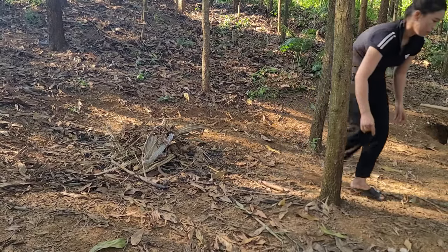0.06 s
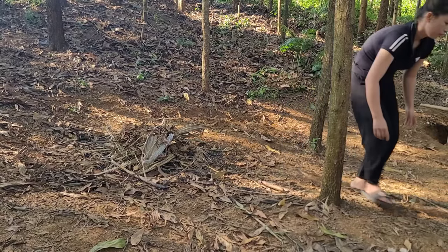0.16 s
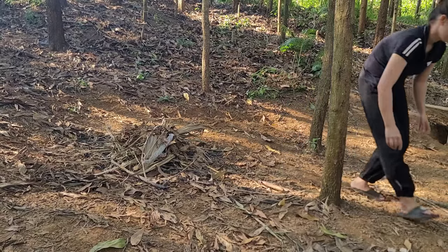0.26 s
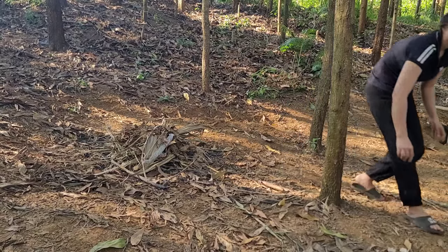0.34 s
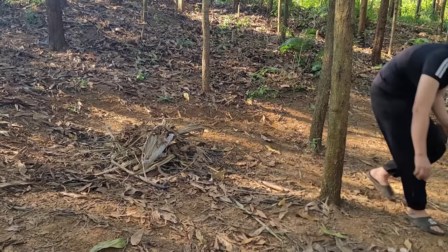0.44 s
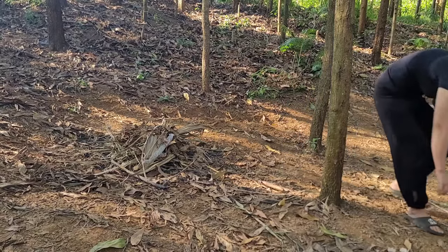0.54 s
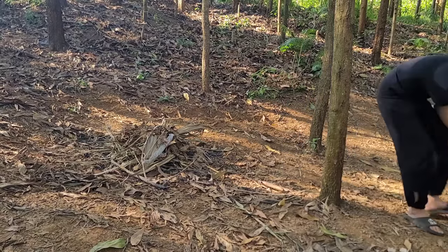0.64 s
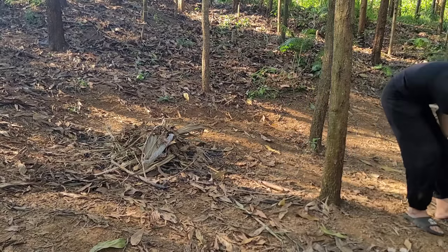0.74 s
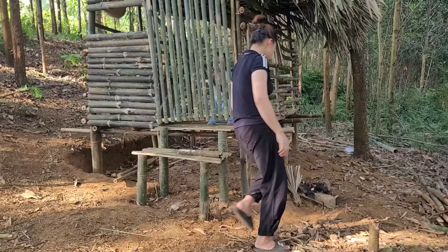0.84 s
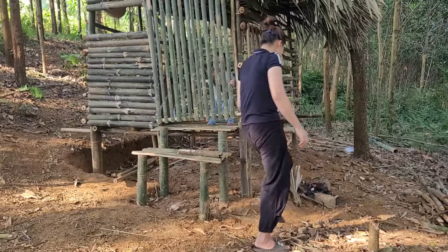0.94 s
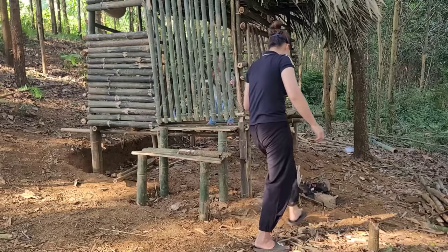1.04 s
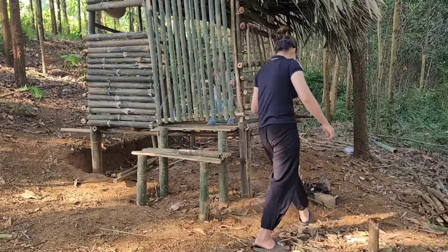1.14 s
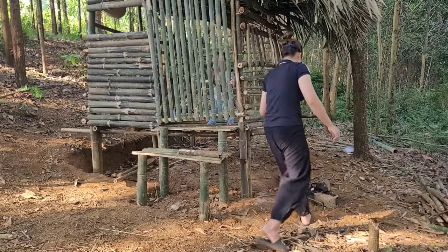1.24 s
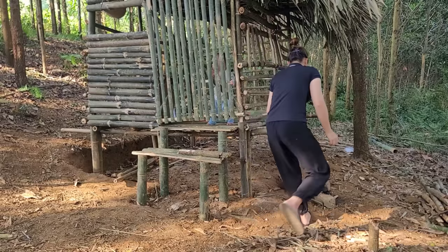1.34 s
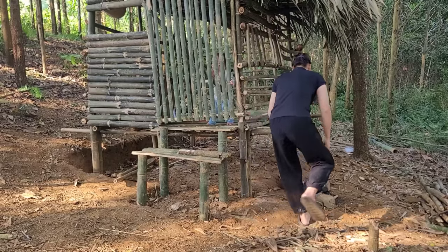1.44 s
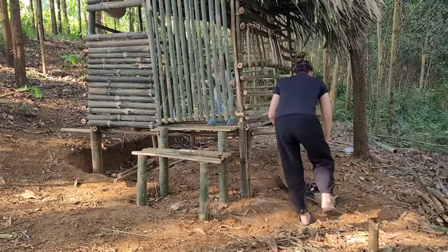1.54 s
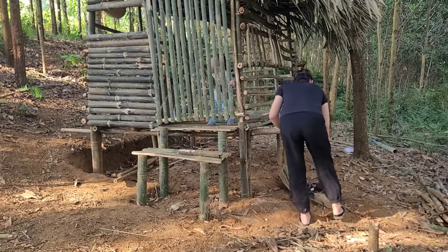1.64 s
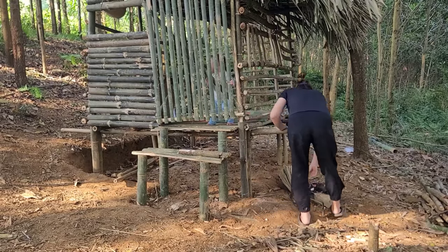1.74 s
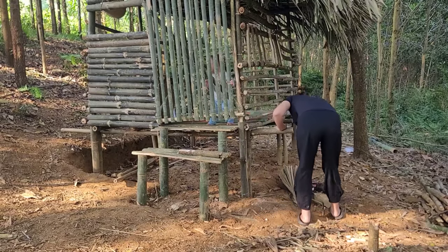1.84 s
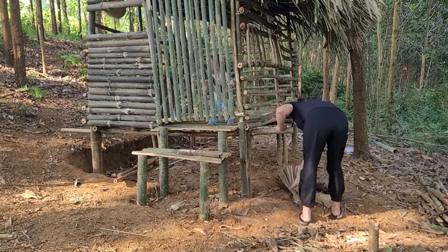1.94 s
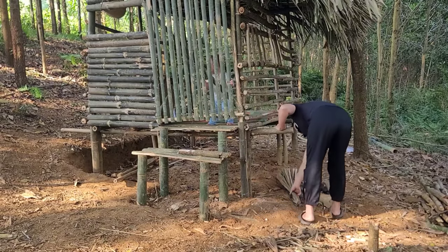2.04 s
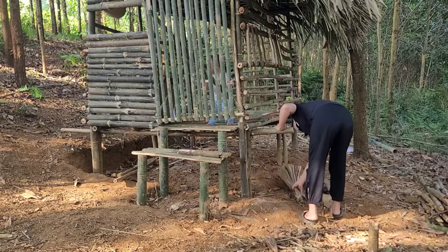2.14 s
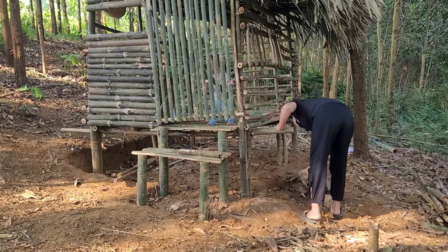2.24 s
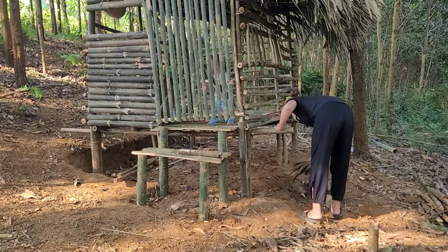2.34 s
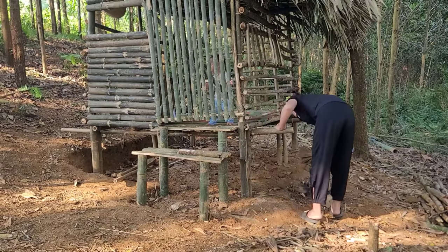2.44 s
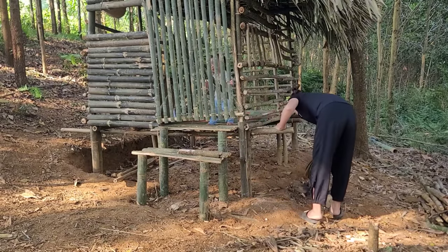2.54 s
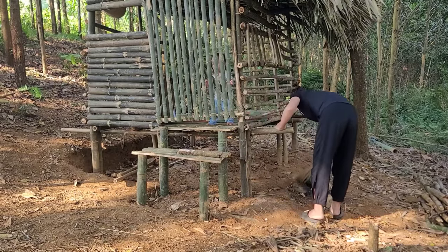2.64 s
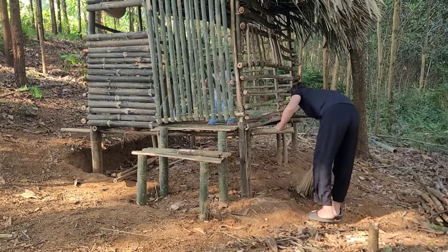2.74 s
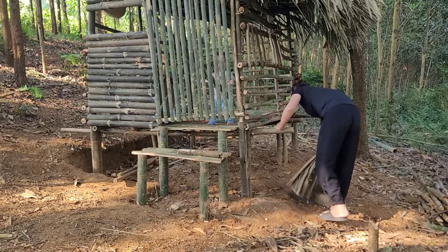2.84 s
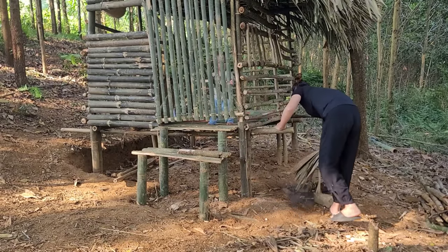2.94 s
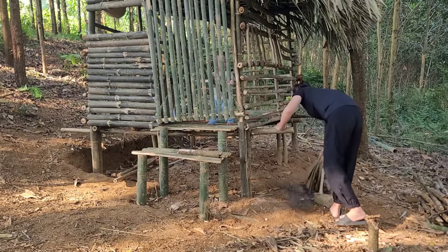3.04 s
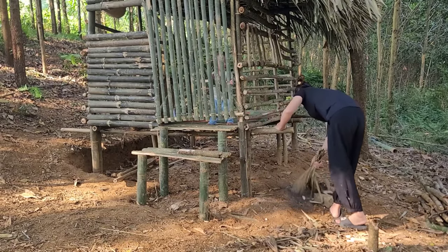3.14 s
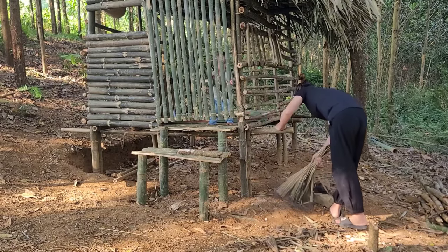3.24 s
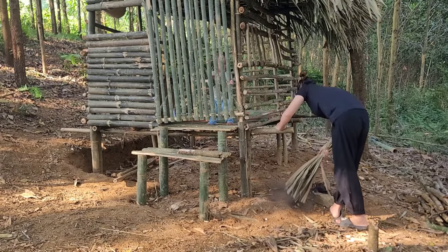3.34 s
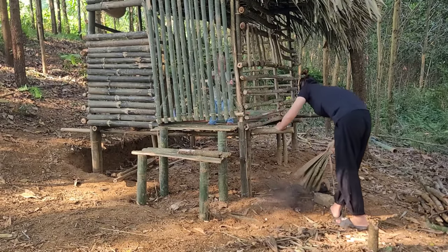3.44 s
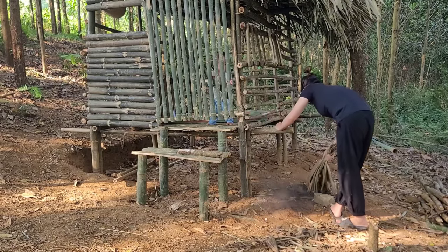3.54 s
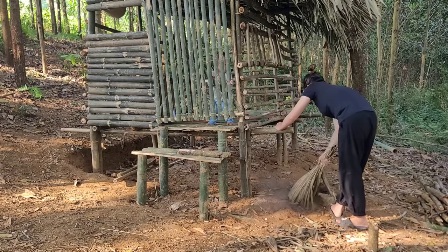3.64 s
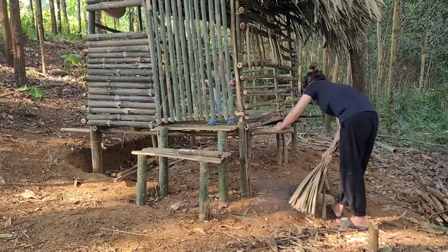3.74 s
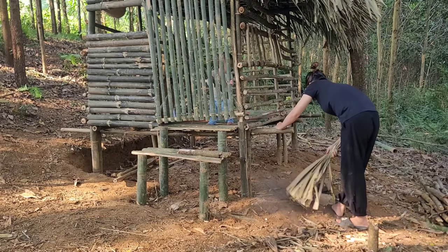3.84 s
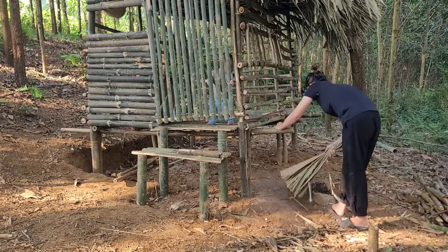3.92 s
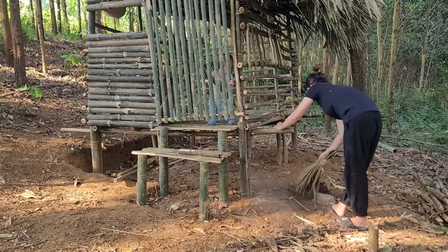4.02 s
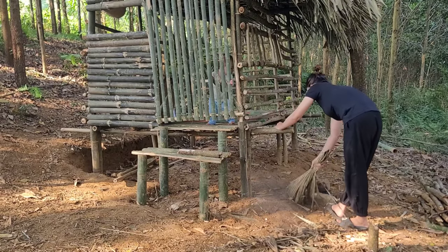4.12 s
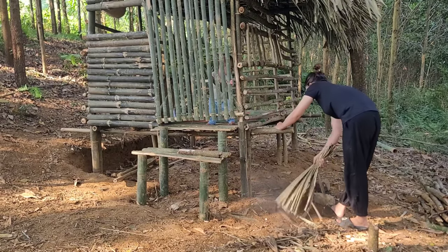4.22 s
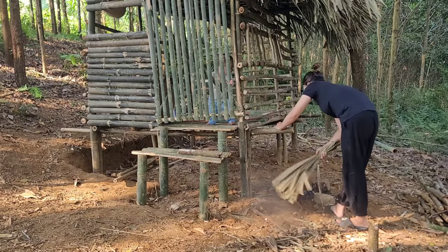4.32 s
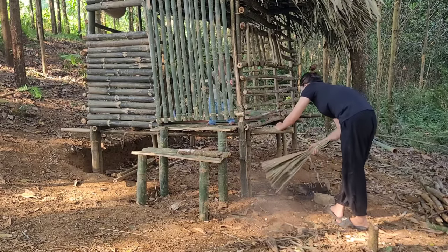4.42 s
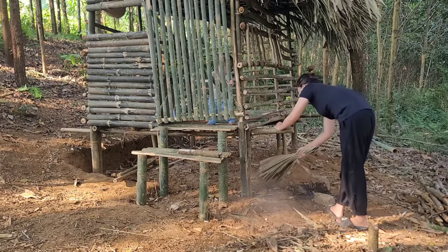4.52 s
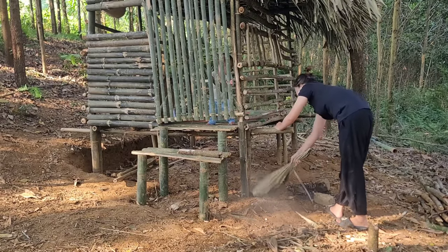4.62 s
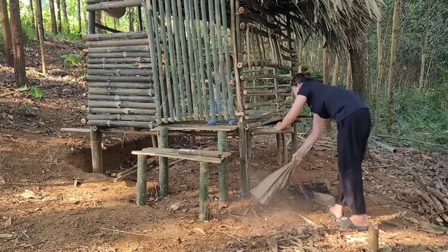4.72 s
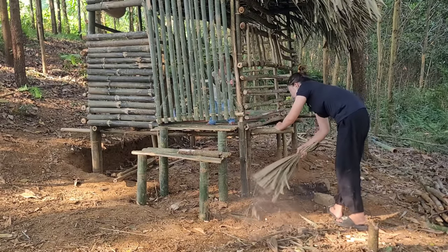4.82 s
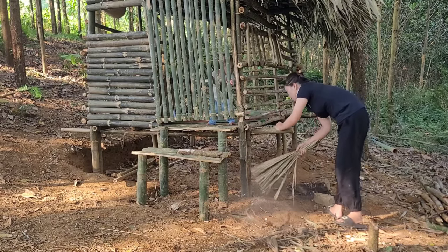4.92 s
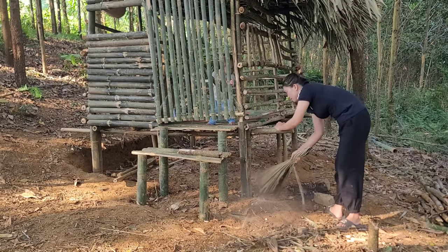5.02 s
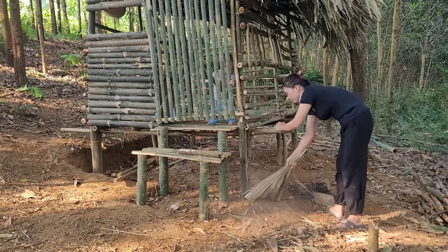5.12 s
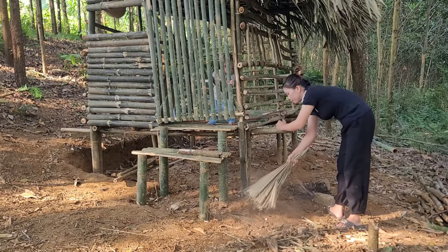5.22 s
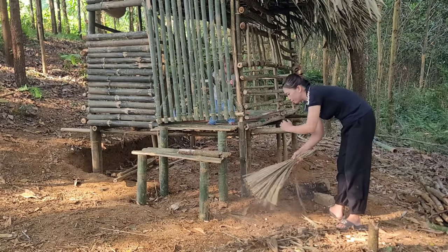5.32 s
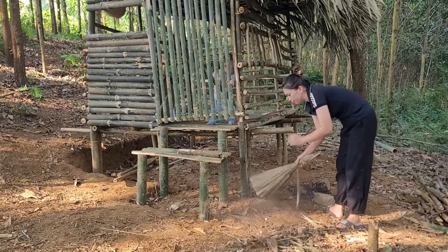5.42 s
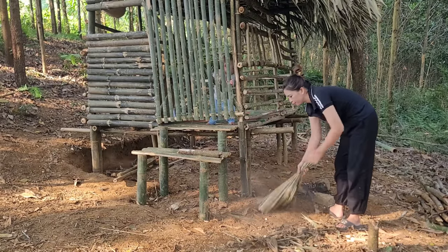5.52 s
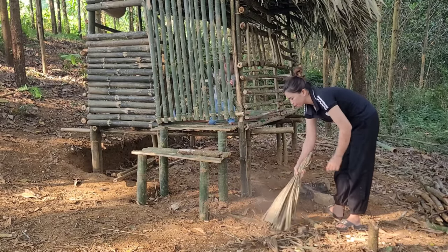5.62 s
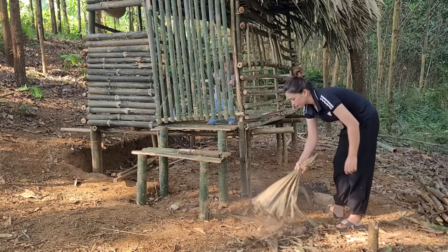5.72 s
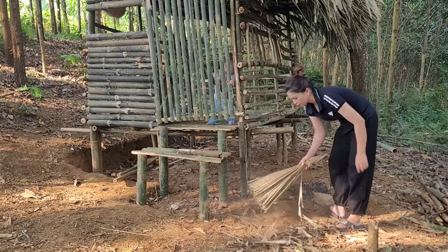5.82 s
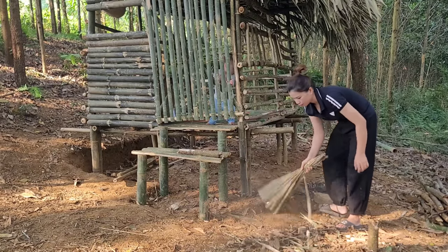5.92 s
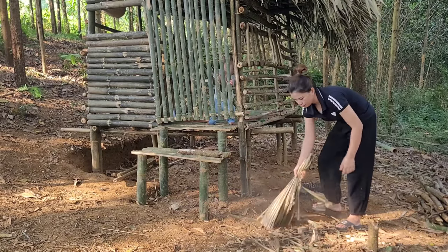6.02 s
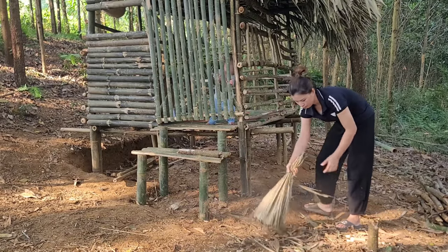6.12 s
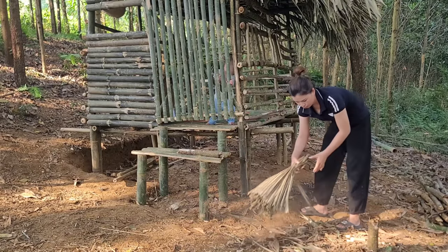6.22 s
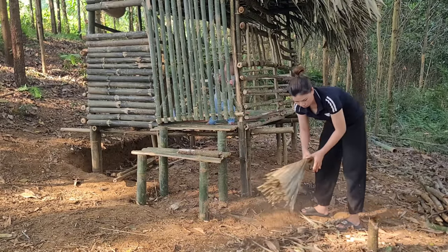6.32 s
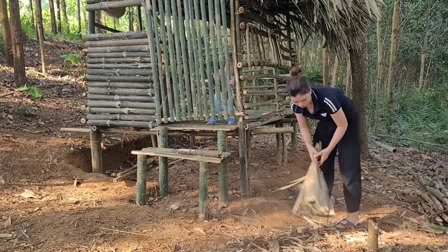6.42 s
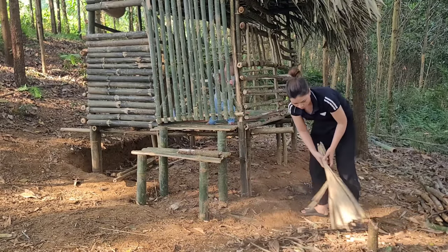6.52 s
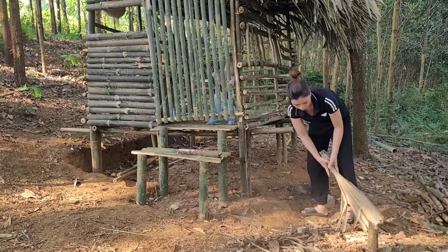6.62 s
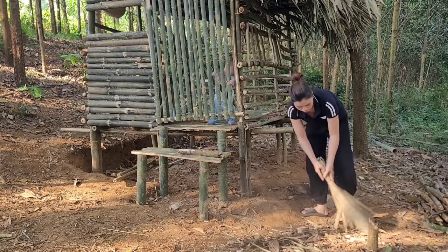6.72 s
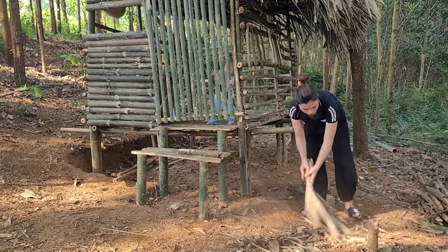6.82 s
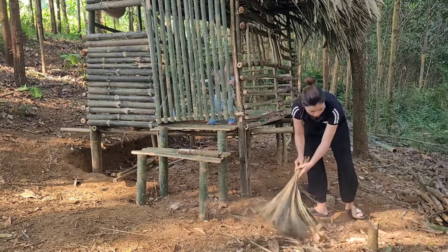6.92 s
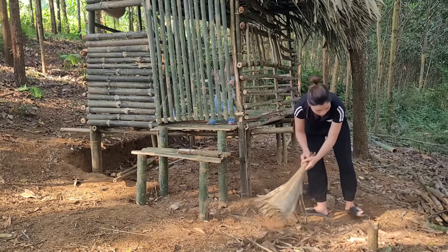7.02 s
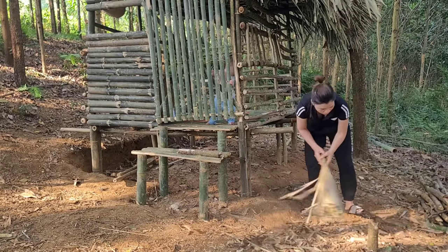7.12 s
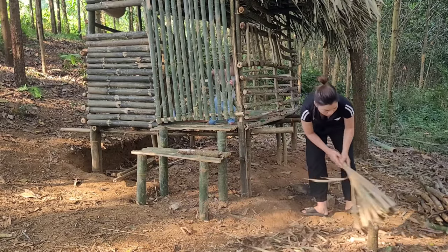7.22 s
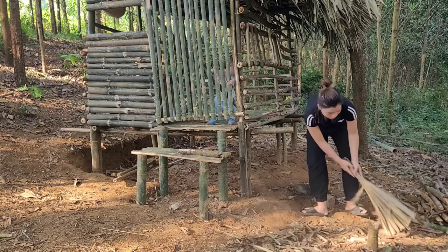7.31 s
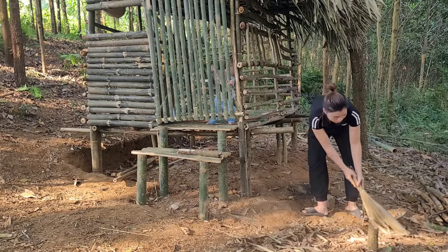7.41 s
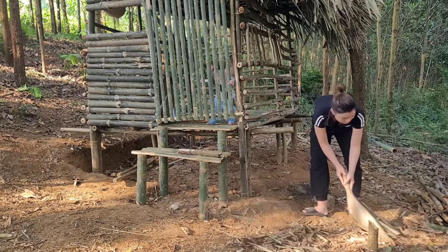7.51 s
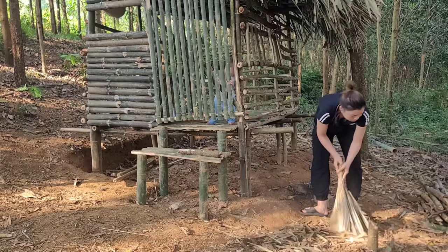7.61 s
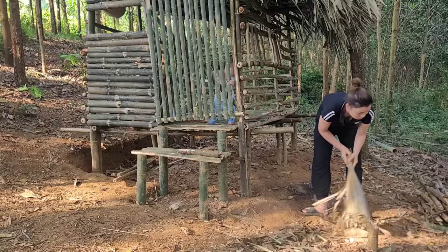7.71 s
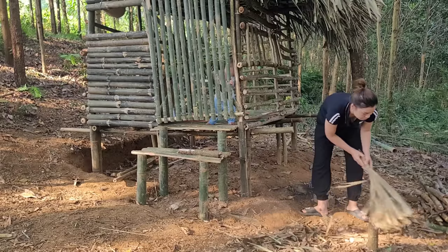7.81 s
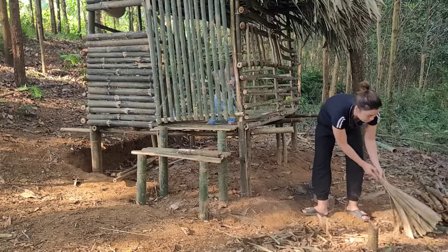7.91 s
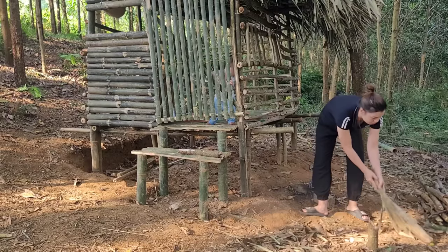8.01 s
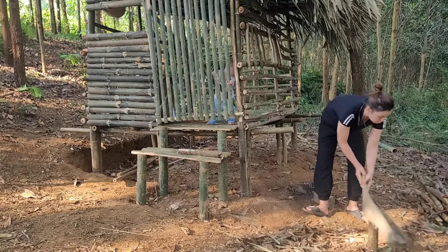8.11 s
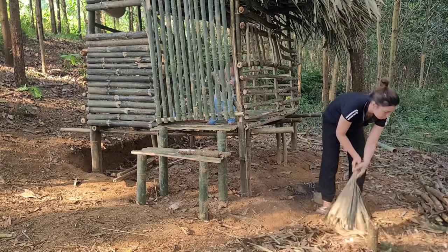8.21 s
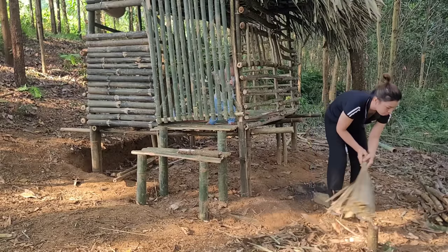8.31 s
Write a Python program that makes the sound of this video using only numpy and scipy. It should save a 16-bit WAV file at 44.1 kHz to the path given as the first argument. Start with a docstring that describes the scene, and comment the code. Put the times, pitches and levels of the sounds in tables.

```python
"""Insects trill all round over noise-made air; a far single-cylinder engine, a sum of firing orders, chugs on a slope.
A short silence leads to a second scene by a hut, where the engine is gone, with a low rumble in the air and
more insects; birds glide far off. Sandalled steps slap and thud as short noise bursts, amid light scuffs in the litter.
Then a dry-grass broom makes eleven strokes over bare earth: random grains scrape, rumble, hiss and crackle.
Twigs snap now and then; nearby surfaces scatter the near sounds and the wood returns a faint tail."""
import sys
import numpy as np
from scipy import signal
from scipy.fft import rfft, irfft, next_fast_len
from scipy.io import wavfile
from scipy.ndimage import uniform_filter1d

SR = 44100
rng = np.random.default_rng(int(sys.argv[2]) if len(sys.argv) > 2 else 0)


def pcm_store(signal):
    """Save signal as 16-bit PCM."""
    levels = np.round(np.clip(np.atleast_2d(signal), -1, 1) * 32767)
    wavfile.write(sys.argv[1], SR, levels.astype(np.int16).T)


N = 368676
TIME_S = np.arange(N) / SR
FFT_LEN = next_fast_len(N + SR, True)
FREQ_HZ = np.fft.rfftfreq(FFT_LEN, 1 / SR)

SLOPE_END_S, HUT_START_S = 0.838, 0.862  # silent between the two scenes

# Air spectra of the two scenes. Each row: frequency in Hz, relative density in dB per Hz.
SLOPE_AIR = [(25, -8), (120, 19), (300, -3), (450, -10.5), (750, -10.5), (1700, -6), (3500, -14),
             (5800, -20), (6700, -5), (7400, 8), (8600, -40), (11500, -25), (15500, -20)]
HUT_AIR = [(25, -21), (55, -1.5), (170, -2.5), (280, -15), (500, -15), (1400, -27), (3500, -29.5),
           (5000, -19), (5900, -26), (6700, -7), (7300, 2), (8800, -36), (11500, -23.5), (15500, -16.5)]
SLOPE_AIR_DB, HUT_AIR_DB = -54.5, -58  # rms before the slow swell
# Insects. Each row: start in seconds, rms level in dB, pitch in Hz, half-width of the band in Hz, mean pulses per second.
INSECTS = [(0, -68.5, 7200, 90, 28), (0.86, -62, 7210, 69.5, 20), (0.86, -69, 7370, 110, 22),
           (0.86, -66.5, 7940, 70, 26), (2.05, -62, 6400, 140, 27)]
# Engine speed. Each row: time in seconds, firings per second.
ENGINE_SPEED = [(0, 28), (0.3, 28.5), (0.5, 27.5), (0.84, 27.5)]
# Engine orders. Each row: multiple of the firing rate, rms level in dB before wavering.
ENGINE_ORDERS = [(1, -68), (1.5, -74), (2, -54.5), (3, -65), (4, -54), (5, -57), (6, -55.5), (7, -80),
                 (8, -89), (9, -81), (10, -86)]
# Far bird whistles. Each row: start in seconds, length in seconds, first pitch in Hz, last pitch in Hz, rms level in dB.
BIRDS = [(0.706, 0.112, 1076, 1230, -66), (0.88, 0.058, 1330, 1400, -80), (1.597, 0.28, 5060, 4950, -79)]

# Sandalled steps. Each row: time in seconds, slap peak in dB, slap centre in Hz, heel thud in dB re slap;
# slaps and thuds each get a common trim in steps().
STEPS = [(1.161, -43, 1840, -1), (1.268, -48, 2530, -20), (1.393, -54.5, 1770, -22),
         (1.463, -57, 3780, -15), (1.775, -47.5, 1750, -8), (2.297, -45, 1720, -18),
         (2.341, -46, 1800, -20)]
HEEL_CENTRE_HZ = 560
# Snapping twigs and stalks. Each row: time in seconds, peak in dB before the trim in snaps(), centre in Hz.
SNAPS = [(0.378, -39, 3540), (2.133, -34, 7640), (2.372, -38, 3020), (2.693, -21.5, 1760),
         (2.978, -19, 5500), (3.596, -18, 6650), (3.736, -35, 4400), (3.948, -31.5, 1010),
         (4.041, -30, 7200), (4.886, -18.5, 5430), (4.91, -24.5, 1480), (4.946, -24, 2820),
         (5.322, -15.5, 6090), (5.727, -21, 2310), (6.228, -27, 1460), (6.599, -20, 4940),
         (7.269, -28, 4150), (7.291, -24.5, 3650), (7.985, -12, 3740)]

# Broom strokes. Each row: touch-down in seconds, pressing in in seconds, full pressure in seconds,
# level in dB before the arch, first touch in dB re full, easing off in dB per second,
# then soil rumble, tip hiss and settling litter, each in dB re level.
STROKES = [ (2.568, 0.13, 0.099, -34.5, -11.5, 90, -7.5, -2, -6),
           (3.067, 0.12, 0.07, -31.5, -9, 109, -7.5, -2.5, -17),
           (3.588, 0.058, 0.054, -28.5, -7, 153, -8.5, -1, -15.5),
           (4.040, 0.083, 0.11, -31, -18, 130, -7.5, 0, -13.5),
           (4.592, 0.047, 0.098, -30.5, -12, 102, -10, -6, -13),
           (5.011, 0.083, 0.11, -30.5, -26, 135, -8.5, -5, -11),
           (5.474, 0.042, 0.14, -30.5, -9.5, 126, -9.5, -4.5, -16.5),
           (5.932, 0.06, 0.12, -30, -16, 155, -9, -5, -18),
           (6.716, 0.14, 0.15, -31.5, -10.5, 180, -11.5, -5, -16.5),
           (7.286, 0.17, 0.16, -33, -11, 86, -9, -6.5, -17.5),
           (7.874, 0.18, 0.12, -31, -12.5, 79, -9, -4.5, -20)]
TOUCH_RISE_S, ARCH_DB = 0.0097, 1.4  # quick touch; slight swell in mid-push
EARTH_POWER = 1.17  # rumble grows faster with pressure than scrape
# Scuffs of the feet and catches of the broom in the litter. Each row: start in seconds, length in seconds,
# level in dB, soil rumble in dB re level, hiss in dB re level.
SCUFFS = [ (0.21, 0.26, -63.5, -15, -13), (1.097, 0.036, -57, -13, -2), (1.255, 0.032, -61.5, -18, 3),
          (1.961, 0.22, -59, -9, -5), (2.284, 0.075, -55.5, -21, 0), (2.41, 0.14, -62, -20, -4),
          (2.69, 0.011, -39, -4, 6), (2.786, 0.012, -32.5, -3, 1.5), (3.076, 0.034, -39.5, -11, -1),
          (4.205, 0.044, -34, -9.5, -18), (4.996, 0.015, -42.5, -3, -2), (5.295, 0.016, -40.5, -5.5, -8),
          (6.20, 0.021, -48, -6, -10), (6.34, 0.036, -51.5, -28, -2), (6.509, 0.2, -44.5, -13.5, -7),
          (6.735, 0.047, -36, -8, -15), (6.822, 0.03, -34, -7, -0.5), (7.283, 0.012, -38.5, -9, -18),
          (7.878, 0.015, -37, -5.5, -2)]
SCUFF_RISE_SHARE, SCUFF_FALL_DB_PER_S = 0.27, 258  # rise as a share of length
SETTLE_EARTH_DB, SETTLE_TIPS_DB = -14, -3.5  # rumble and hiss re settling level
SETTLE_FALL_DB_PER_S = 19.5  # swept leaves and grit keep tumbling
TICKS_DB, TICKS_PER_S = -5.5, 110  # single leaves flipping, re litter level
# Where the broom works. Each row: time in seconds, lag of the left port in samples,
# leaf crackle in dB re scrape, before the leaf trim in broom().
BROOM_PATH = [(1.1, 5.9, -3), (2.8, 5.06, 0.5), (3.7, 5.5, -9), (4.2, 4.47, -5.5), (4.7, 3.5, -13),
              (5.6, 3.4, -16), (6.1, 3.97, -24), (6.95, 4.6, -5.5), (7.35, 7.36, 0), (7.7, 5.9, -4.5),
              (7.95, 9.8, -2.5), (8.3, 5.5, -5)]
# Stalks on soil. Each row: frequency in Hz, relative density in dB per Hz.
SCRAPE_SPECTRUM = [(40, -50), (90, -14.5), (160, -5.0), (450, -6.5), (680, -2.5), (900, -5.5), (1500, 0.6),
                   (2300, 0.0), (2800, -1.4), (3600, -0.9), (6500, -0.2), (8200, -8.5), (10500, -3.5),
                   (15500, -8.5)]
# Dry leaves. Each row: frequency in Hz, relative density in dB per Hz.
LEAF_SPECTRUM = [(1500, -25), (3000, -2), (3700, 1), (4500, 3), (5600, -7), (7500, -17), (11000, -6.5),
                 (16000, -41)]

# Decay of the wood's echo. Each row: frequency in Hz, T60 in seconds.
WOOD_T60 = [(150, 0.5), (700, 0.35), (1500, 0.5), (4000, 0.58), (7000, 0.6), (14000, 0.4)]
# Strength of the wood's echo. Each row: frequency in Hz, level in dB re direct sound.
WOOD_ECHO = [(100, -11.5), (700, -19), (1500, -8), (6000, -6.5), (9000, -10.5), (15000, -9)]
# Scatter off the ground and the hut. Each row: frequency in Hz, level in dB re direct sound.
SCATTER = [(100, -20), (700, -11), (1500, -7), (3000, -2), (6500, -3), (8200, 1), (10500, 0), (15000, 1)]
# Port balance. Each row: frequency in Hz, left minus right in dB.
PORT_BALANCE = [(100, 0), (900, -0.3), (1500, -1.7), (3500, -0.3), (4500, -3.6), (7200, -3.4), (8100, 5),
                (8600, 3), (9400, -5.5), (11000, -2), (13500, 1.7), (16000, -1)]
BAND_EDGE_HZ = 15850


def gain_of(db):
    """Decibels to an amplitude factor."""
    return 10 ** (np.asarray(db) / 20)


def evened(x):
    """Scales to rms 1."""
    return x / np.sqrt(np.mean(x ** 2) + 1e-20)


def read(points, hz):
    """Interpolates a frequency table on a log-frequency axis."""
    f, value = np.transpose(points)
    return np.interp(np.log(hz + 1), np.log(f + 1), value)


def follow(rows):
    """Interpolates the columns of a time table, sample by sample."""
    s, *columns = np.transpose(rows)
    return [np.interp(TIME_S, s, column) for column in columns]


def add(mix, start_s, sound):
    """Adds a sound into the mix at its start time."""
    part = mix[max(round(start_s * SR), 0):][:len(sound)]
    part += sound[:len(part)]


def colour(x, gain):
    """Filters by a gain given on FREQ_HZ."""
    return irfft(rfft(x, FFT_LEN) * gain)[..., :N]


def wander(per_s, count=N):
    """Random points joined by lines, rms 1."""
    points = rng.standard_normal(8192)
    return evened(np.interp(TIME_S[:count] * per_s, np.arange(len(points)), points))


def diffuse(pair, hz, same_hz=2900):
    """Sound from all sides: alike at both ports in the bass, unrelated in the treble."""
    same = np.sinc(hz / same_hz)
    return np.array([pair[0], same * pair[0] + np.sqrt(1 - same ** 2) * pair[1]])


def contact(start_s, rise_s, held_s, fall_db_per_s):
    """Envelope of a touch: linear attack, hold, then a steady fall in dB."""
    t = TIME_S - start_s
    return np.clip(t / rise_s, 0, 1) * gain_of(-abs(fall_db_per_s) * np.maximum(t - held_s, 0))


def hits(rows, level_db, t60_s, octaves):
    """Each break or footfall is a short dying noise burst, strongest around its own centre."""
    out, t = np.zeros(N), np.arange(4096) / SR
    hz = np.fft.rfftfreq(len(t), 1 / SR) + 1
    lead_s = 128 / SR  # room for the zero-phase filter to spread ahead of the onset
    noises = rng.standard_normal((len(rows), len(t)))
    for (s, peak_db, centre_hz), noise in zip(rows, noises):
        burst = noise * (t >= lead_s) * gain_of(-60 * (t - lead_s) / t60_s)
        burst = irfft(rfft(burst) / (1 + (np.log2(hz / centre_hz) / octaves) ** 2))
        add(out, s - lead_s, gain_of(peak_db + level_db) * burst / abs(burst).max())
    return out


def grains(gain, per_s, spread_db, patchy_db):
    """Tiny slips of uneven size; each passing tuft of stalks favours its own pitches for some milliseconds."""
    size = gain_of(spread_db * np.minimum(rng.exponential(1, N), 4.5))
    sign = rng.choice([-1., 1.], N)
    clicks = size * sign * (rng.random(N) < per_s / SR)
    z = signal.stft(clicks, nperseg=256)[2]
    tufts = uniform_filter1d(rng.standard_normal(z.shape), size=5, axis=0)
    tufts = evened(uniform_filter1d(tufts, size=5, axis=1))
    patchy = signal.istft(z * gain_of(patchy_db * tufts), nperseg=256)[1][:N]
    return evened(colour(patchy, gain))


def air(spectrum, level_db, swell_db):
    """Far rumble, foliage and the massed insect chorus as diffuse noise with a slow swell."""
    noise = diffuse(rfft(rng.standard_normal((2, FFT_LEN))), FREQ_HZ)
    shaped = irfft(noise * gain_of(read(spectrum, FREQ_HZ)))[:, :N]
    return gain_of(level_db + swell_db * wander(9.9)) * evened(shaped)


def insects():
    """Each wing rings in a narrow band, pulsed at its own rate and blurred by distance."""
    out = np.zeros((2, N))
    for start_s, level_db, pitch_hz, width_hz, per_s in INSECTS:
        band = 1 / (1 + ((FREQ_HZ - pitch_hz) / width_hz) ** 2)
        ring = colour(rng.standard_normal((2, N)), band)
        turns = np.cumsum(per_s * (1 + 0.062 * wander(4))) / SR
        pulsed = ring * (1 + 0.4 * np.cos(2 * np.pi * turns))
        out += gain_of(level_db) * evened(pulsed) * (TIME_S > start_s)
    return out


def engine(first_firing_s=0.0037, smear_rad=0.066):
    """Dull exhaust beats; the way through the trees smears them and makes each order waver."""
    count = int(SLOPE_END_S * SR)
    firings_per_s = follow(ENGINE_SPEED)[0][:count]
    turns = np.cumsum(firings_per_s) / SR - first_firing_s * ENGINE_SPEED[0][1]
    beats = np.zeros(count)
    for order, level_db in ENGINE_ORDERS:
        level = gain_of(level_db + 2.0 * wander(17, count))
        phase = 2 * np.pi * order * turns - smear_rad * order ** 2 + 0.26 * wander(14.1, count)
        beats += level * np.cos(phase)
    return np.pad(-np.sqrt(2) * beats, (0, N - count))


def birds():
    """Soft gliding whistles: sines with a slightly unsteady pitch."""
    out = np.zeros(N)
    for start_s, length_s, first_hz, last_hz, level_db in BIRDS:
        count = int(length_s * SR)
        hz = np.linspace(first_hz, last_hz, count) * (1 + 0.021 * wander(300)[:count])
        whistle = np.sin(2 * np.pi * np.cumsum(hz) / SR) * signal.windows.tukey(count, 0.6)
        add(out, start_s, gain_of(level_db) * evened(whistle))
    return out


def echoes(x, level, t60, start_s):
    """Random reflections from all sides, each band dying at its own speed."""
    hz, t, z = signal.stft(rng.standard_normal((2, SR)), SR, nperseg=256)
    fade = gain_of(-60 * t / read(t60, hz)[:, None])
    energy = (fade ** 2).sum(1, keepdims=True) * t[1] * SR
    fade *= gain_of(read(level, hz))[:, None] / np.sqrt(energy)
    tail = signal.istft(diffuse(z, hz[:, None]) * fade, SR, nperseg=256)[1]
    tail = np.pad(tail, ((0, 0), (int(start_s * SR), 0)))
    return signal.fftconvolve(x[None], tail, axes=1)[:, :N]


def scatter(x, delay_s):
    """Near reflections, delayed and coloured, that keep wavering in strength and sign."""
    shifting = np.sqrt(2) * np.cos(3 * wander(260))
    delayed = np.pad(x * shifting, (int(delay_s * SR), 0))[:N]
    return colour(delayed, gain_of(read(SCATTER, FREQ_HZ)))


def steps():
    """The sole slaps and the heel thuds on the soil."""
    slaps = [(s, db, hz) for s, db, hz, heel_db in STEPS]
    thuds = [(s, db + heel_db, HEEL_CENTRE_HZ) for s, db, hz, heel_db in STEPS]
    slap = hits(slaps, level_db=-2.5, t60_s=0.068, octaves=0.51)
    thud = hits(thuds, level_db=5.5, t60_s=0.04, octaves=1.3)
    return slap + thud


def snaps():
    """Twigs and stalks break in bright, very short bursts."""
    return hits(SNAPS, level_db=-4.0, t60_s=0.024, octaves=0.51)


def litter():
    """Scrape, rumble and hiss strengths of loose litter: it settles after strokes and stirs under scuffs."""
    power = np.zeros((3, N))
    for s, press_s, full_s, db, *_, settle_db in STROKES:
        settling = gain_of(db + settle_db) * contact(s, press_s, press_s + full_s, SETTLE_FALL_DB_PER_S)
        power += np.outer([1, gain_of(SETTLE_EARTH_DB), gain_of(SETTLE_TIPS_DB)], settling) ** 2
    for s, length_s, db, earth_db, tips_db in SCUFFS:
        scuff = gain_of(db) * contact(s, SCUFF_RISE_SHARE * length_s, length_s, SCUFF_FALL_DB_PER_S)
        power += np.outer([1, gain_of(earth_db), gain_of(tips_db)], scuff) ** 2
    return np.sqrt(power)


def strokes():
    """Scrape, rumble and hiss strengths: the broom touches down, presses in, pushes and eases off."""
    power = np.zeros((3, N))
    for s, press_s, full_s, db, touch_db, ease_db_per_s, earth_db, tips_db, _ in STROKES:
        pressed = np.clip((TIME_S - s) / press_s, 0, 1)
        arch = np.sin(np.pi * np.clip((TIME_S - s - press_s) / full_s, 0, 1))
        push = contact(s, TOUCH_RISE_S, press_s + full_s, ease_db_per_s)
        push *= gain_of(touch_db * (1 - pressed) + ARCH_DB * arch)
        rumble = gain_of(earth_db) * push ** EARTH_POWER
        hiss = gain_of(tips_db) * push
        power += (gain_of(db) * np.array([push, rumble, hiss])) ** 2
    return np.sqrt(power)


def broom(earth_hz=950, tips_hz=7500):
    """The bundle drums the soil, stalks scrape, tips hiss, leaves crackle, all shaken by one stick-slip chatter."""
    loose = litter()
    scrape, rumble, hiss = np.hypot(strokes(), loose)
    leaf_db = follow(BROOM_PATH)[1]
    body = gain_of(read(SCRAPE_SPECTRUM, FREQ_HZ))
    low = 1 / (1 + (FREQ_HZ / earth_hz) ** 8)
    high = 1 / (1 + (tips_hz / (FREQ_HZ + 1)) ** 16)
    middle = body * np.sqrt((1 - low) * (1 - high))

    earth = gain_of(-0.87) * grains(body * np.sqrt(low), per_s=3000, spread_db=1.5, patchy_db=1.5)
    stalks = gain_of(0.9) * grains(middle, per_s=3500, spread_db=1.5, patchy_db=2.0)
    tips = gain_of(-1.9) * grains(body * np.sqrt(high), per_s=9000, spread_db=2.0, patchy_db=1.4)
    leaf_gain = gain_of(read(LEAF_SPECTRUM, FREQ_HZ))
    leaves = gain_of(leaf_db + 0.5) * grains(leaf_gain, per_s=1300, spread_db=1.0, patchy_db=0.5)
    ticks = gain_of(TICKS_DB) * grains(middle, per_s=TICKS_PER_S, spread_db=-1.0, patchy_db=1.5)

    on_soil = 1 / np.sqrt(1 + gain_of(leaf_db) ** 2)  # leaves take over part of the stroke from the soil
    chatter_db = 0.7 * wander(55) + 0.32 * wander(240)
    swept = rumble * earth + scrape * on_soil * (stalks + leaves) + hiss * tips
    return gain_of(chatter_db) * (swept + loose[0] * ticks)


def scene():
    """The sweeper works to the right, so the near sounds reach the left port a little late."""
    slope = air(SLOPE_AIR, SLOPE_AIR_DB, swell_db=0.3)
    hut = air(HUT_AIR, HUT_AIR_DB, swell_db=0.8)
    background = np.where(TIME_S < SLOPE_END_S, slope, hut) + insects() + engine() + birds()
    near = steps() + snaps() + broom()
    lag_samples = np.rint(follow(BROOM_PATH)[0]).astype(int)
    late = near[np.maximum(np.arange(N) - lag_samples, 0)]
    ports = np.array([late + scatter(near, delay_s=0.0031), near + scatter(near, delay_s=0.0022)])
    wood = echoes(near, WOOD_ECHO, WOOD_T60, start_s=0.025)
    return background + wood + ports


def record(dry):
    """The body round the two ports shades each differently; silence between the scenes; the band limit."""
    ports = gain_of(np.array([[.5], [-.5]]) * read(PORT_BALANCE, FREQ_HZ))
    shaded = colour(dry, ports / np.sqrt((ports ** 2).mean(0)))
    heard = shaded * ((TIME_S < SLOPE_END_S) | (TIME_S > HUT_START_S))
    band_limit = signal.firwin(801, BAND_EDGE_HZ, window=("kaiser", 9), fs=SR)
    return signal.oaconvolve(heard, band_limit[None], "same")


dry = scene()
out = record(dry)
pcm_store(out)
```